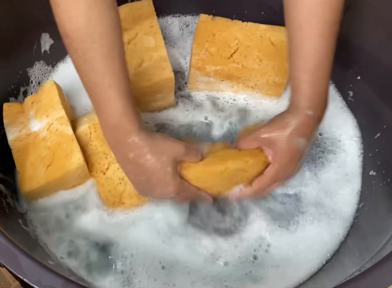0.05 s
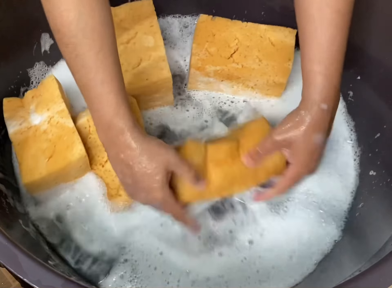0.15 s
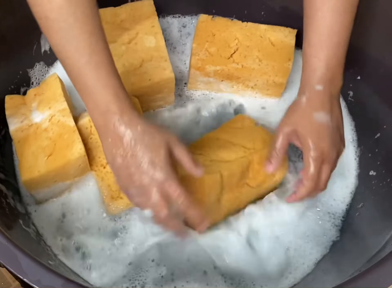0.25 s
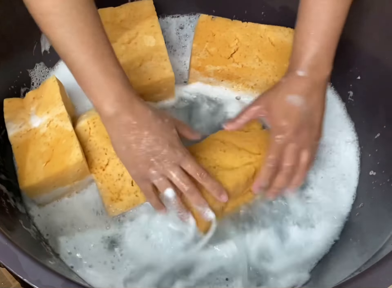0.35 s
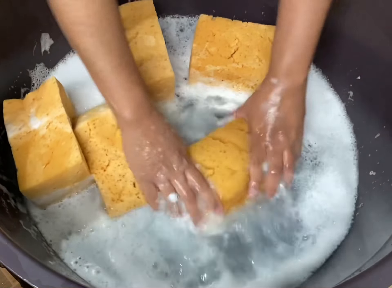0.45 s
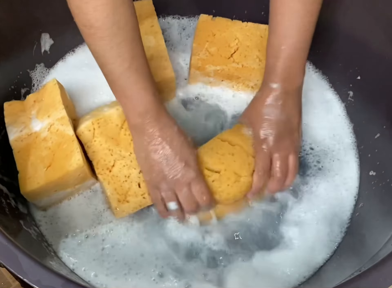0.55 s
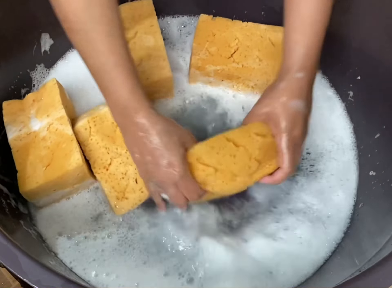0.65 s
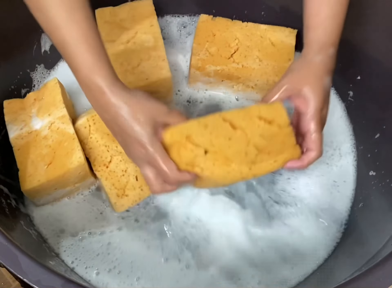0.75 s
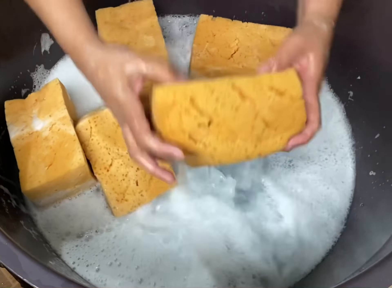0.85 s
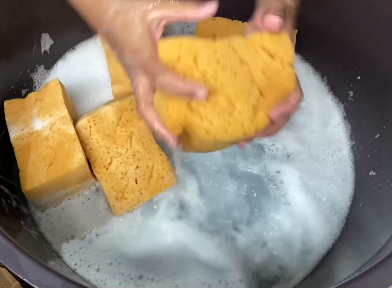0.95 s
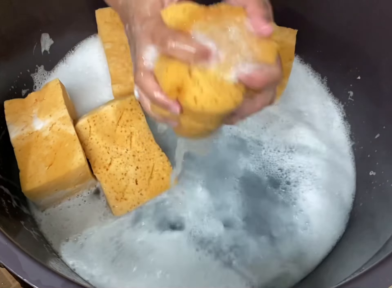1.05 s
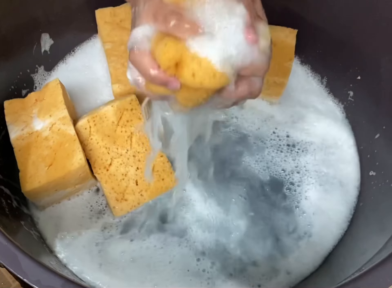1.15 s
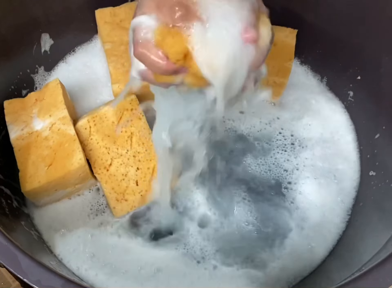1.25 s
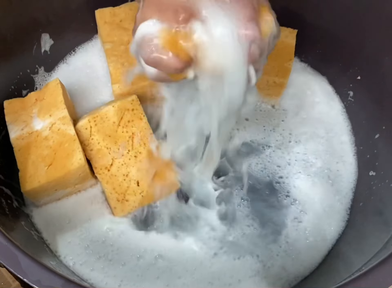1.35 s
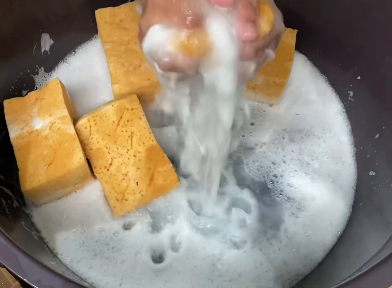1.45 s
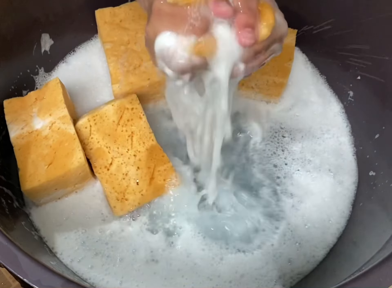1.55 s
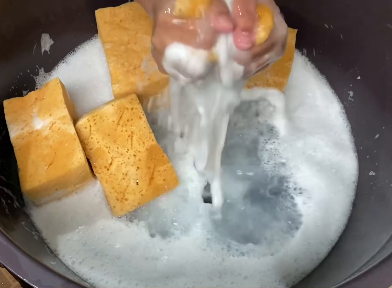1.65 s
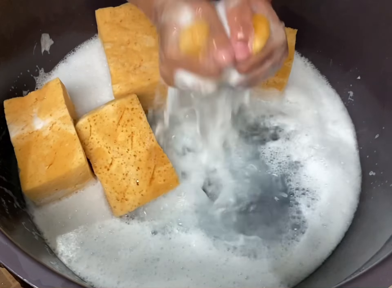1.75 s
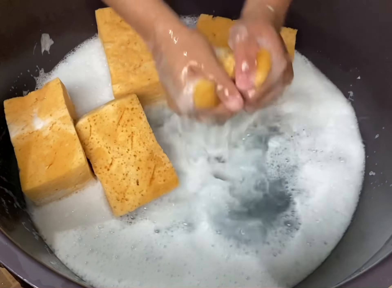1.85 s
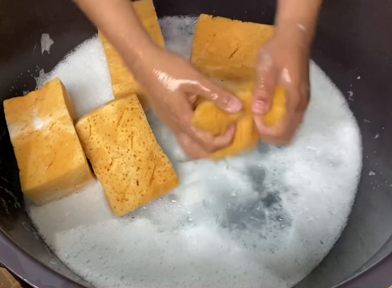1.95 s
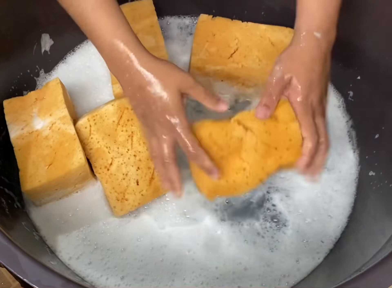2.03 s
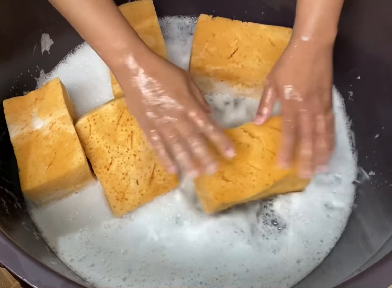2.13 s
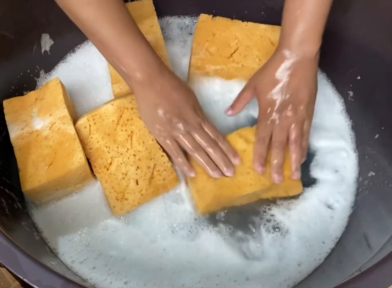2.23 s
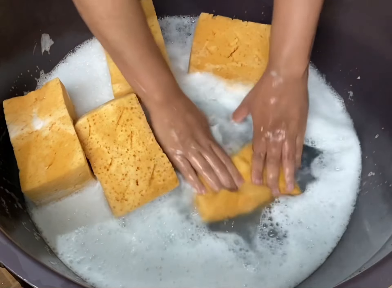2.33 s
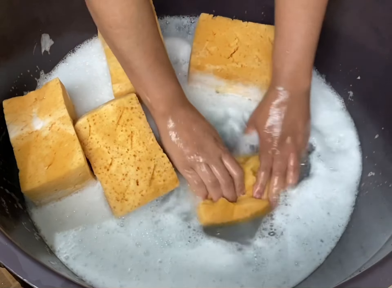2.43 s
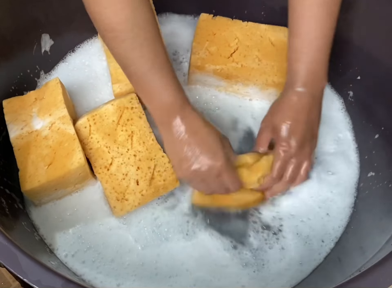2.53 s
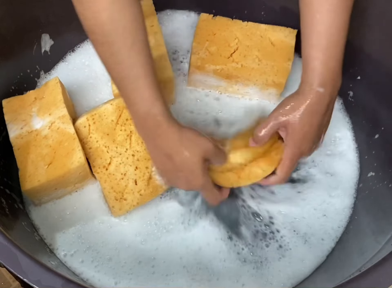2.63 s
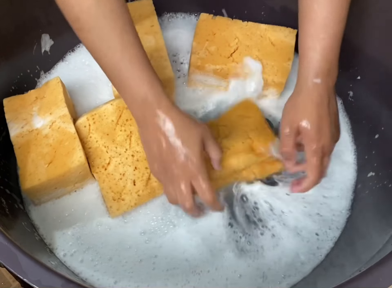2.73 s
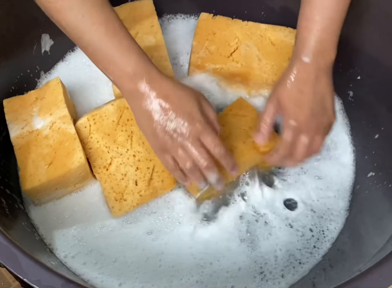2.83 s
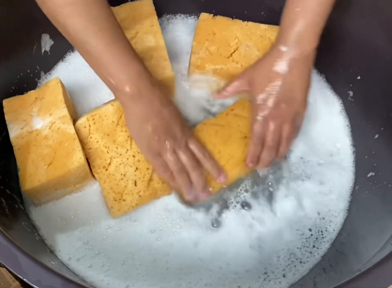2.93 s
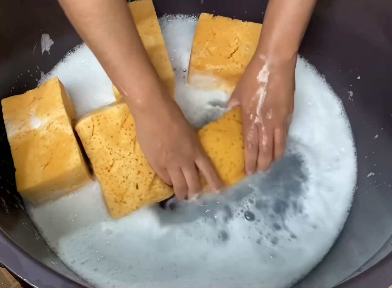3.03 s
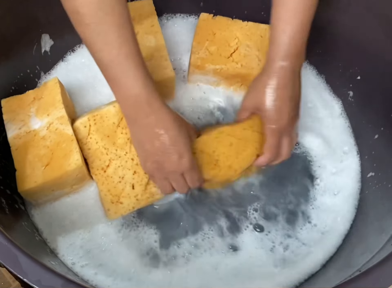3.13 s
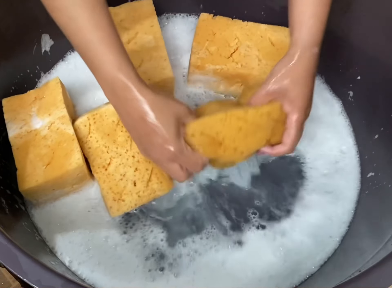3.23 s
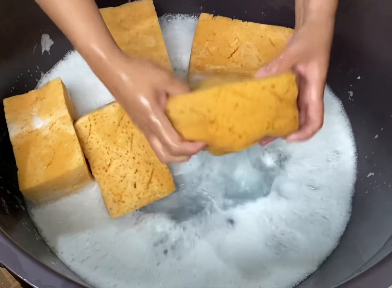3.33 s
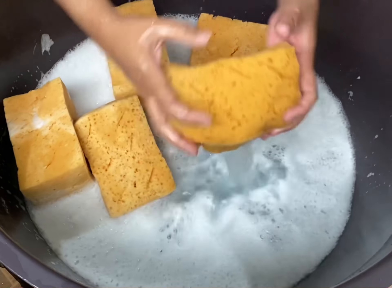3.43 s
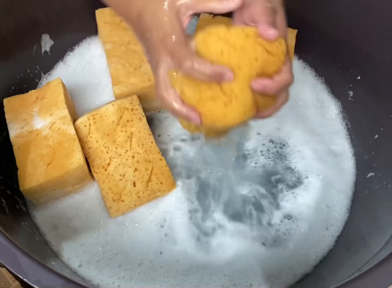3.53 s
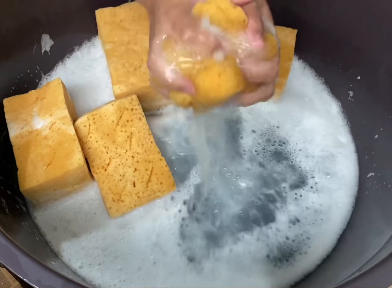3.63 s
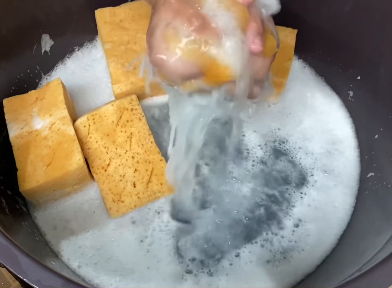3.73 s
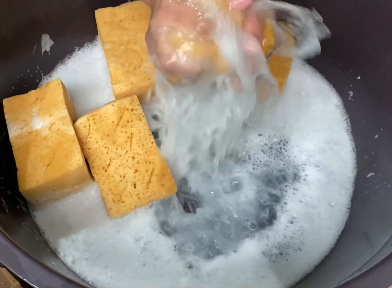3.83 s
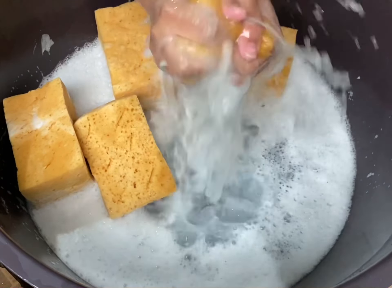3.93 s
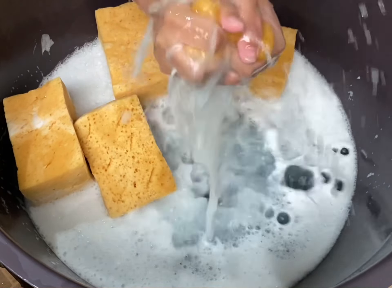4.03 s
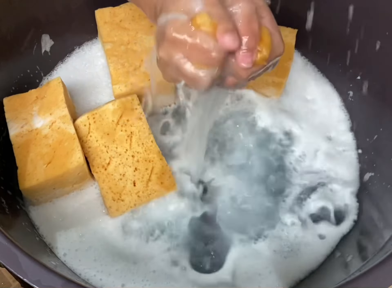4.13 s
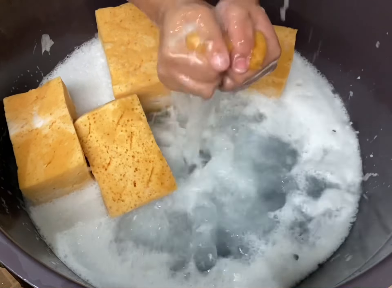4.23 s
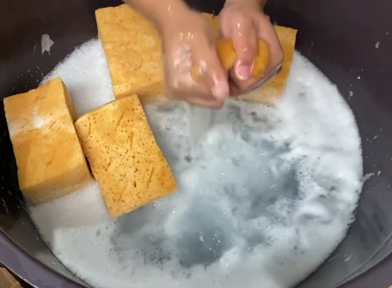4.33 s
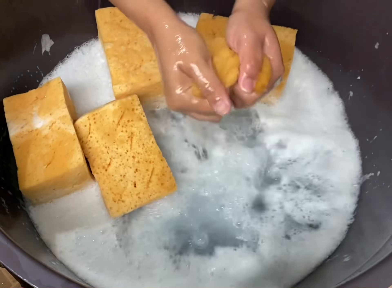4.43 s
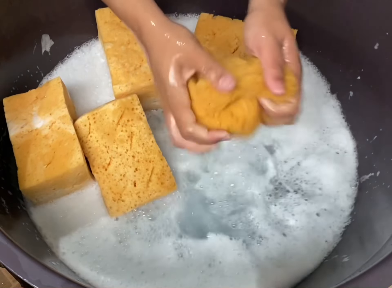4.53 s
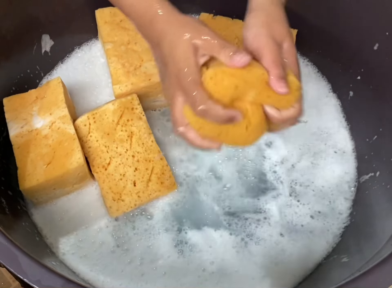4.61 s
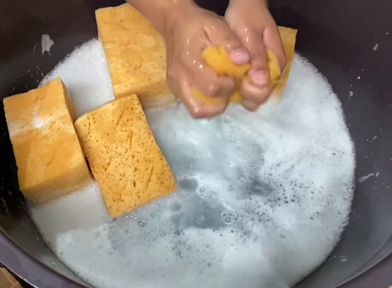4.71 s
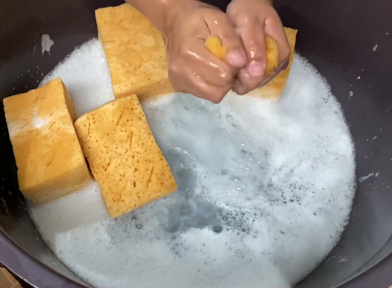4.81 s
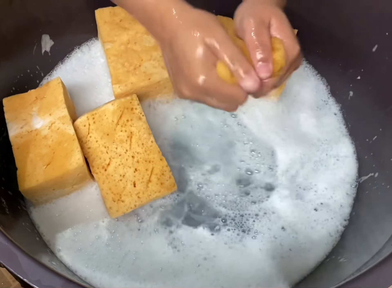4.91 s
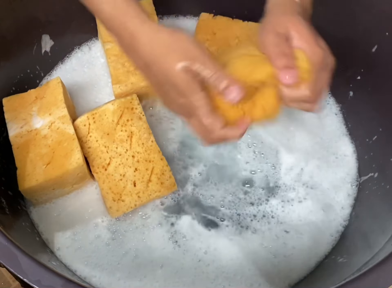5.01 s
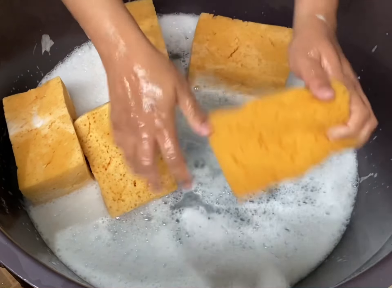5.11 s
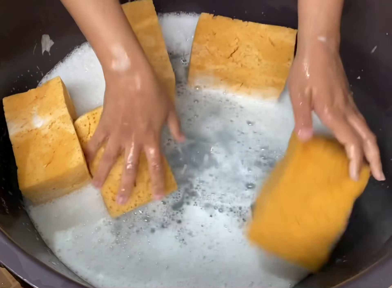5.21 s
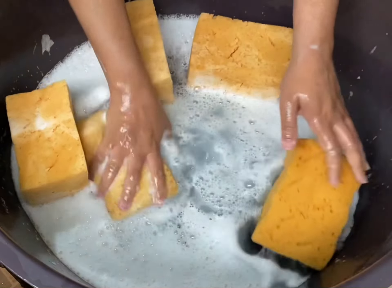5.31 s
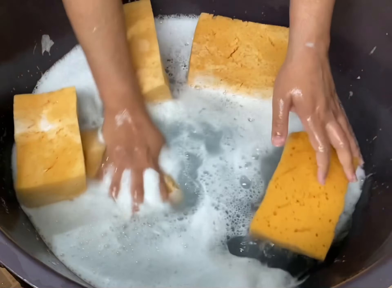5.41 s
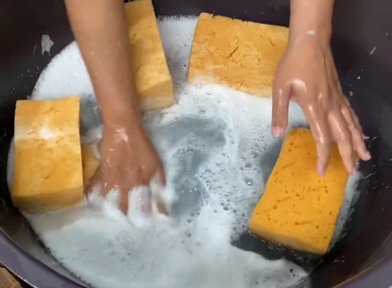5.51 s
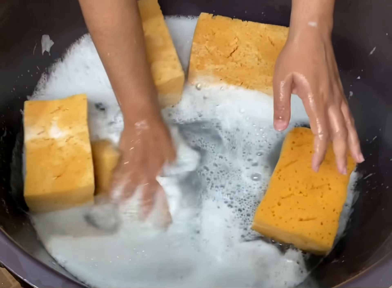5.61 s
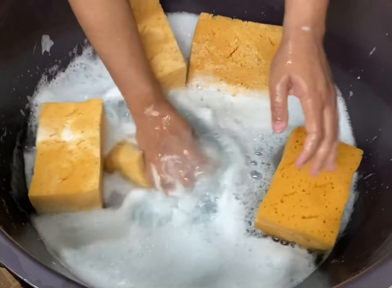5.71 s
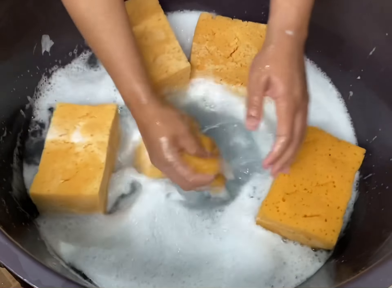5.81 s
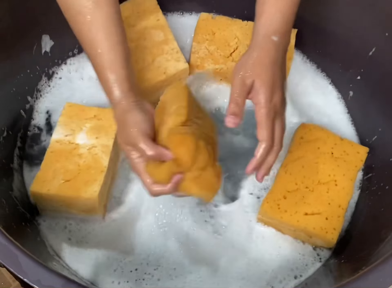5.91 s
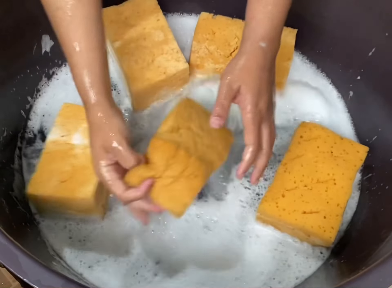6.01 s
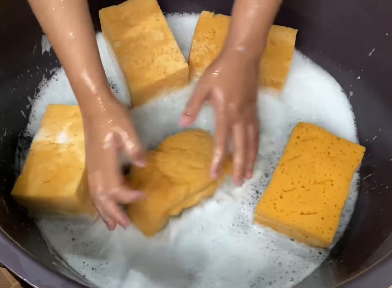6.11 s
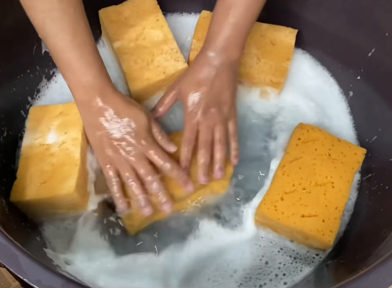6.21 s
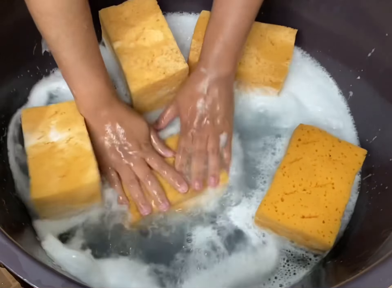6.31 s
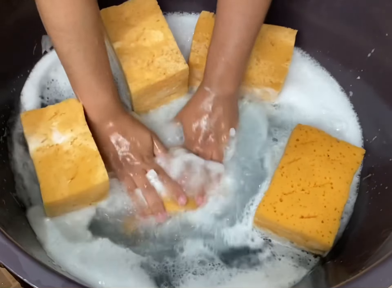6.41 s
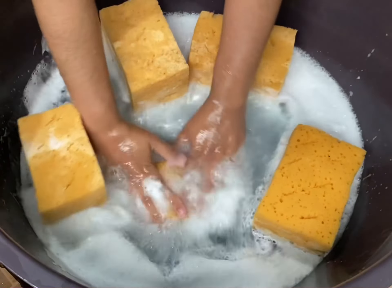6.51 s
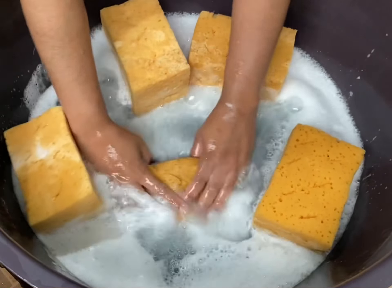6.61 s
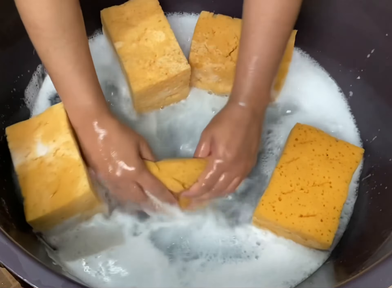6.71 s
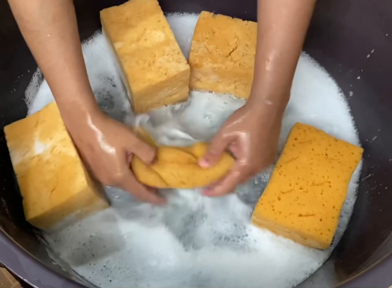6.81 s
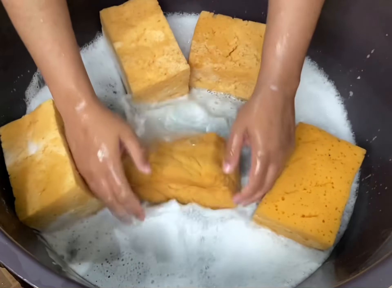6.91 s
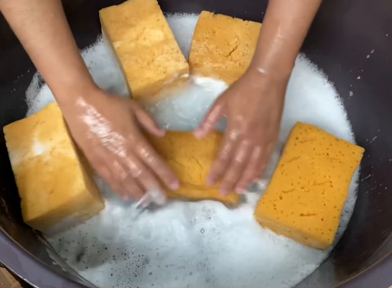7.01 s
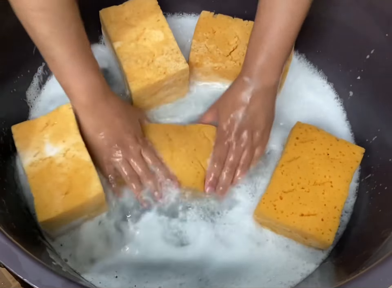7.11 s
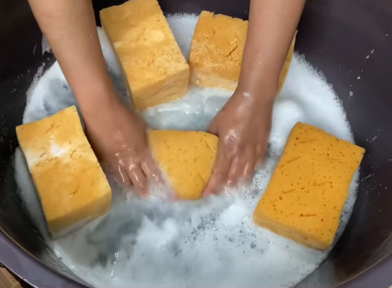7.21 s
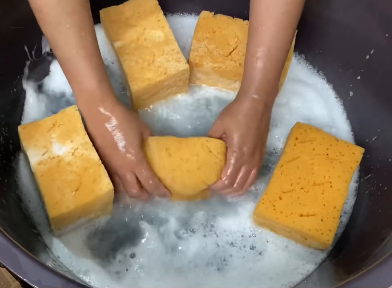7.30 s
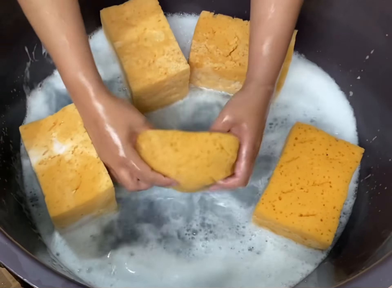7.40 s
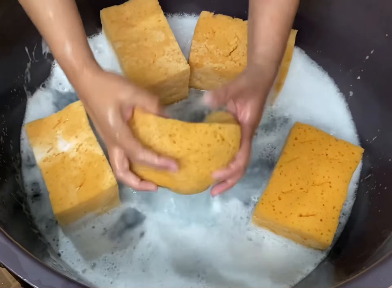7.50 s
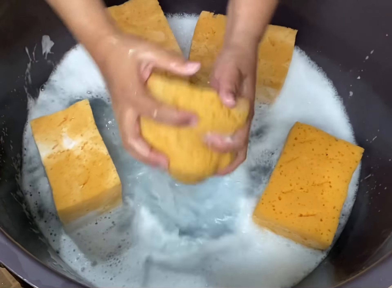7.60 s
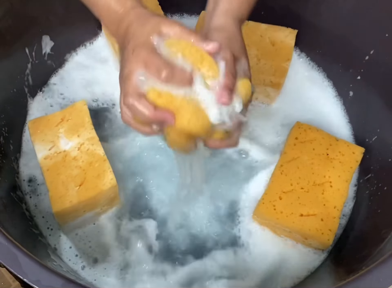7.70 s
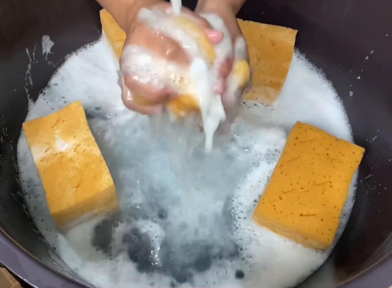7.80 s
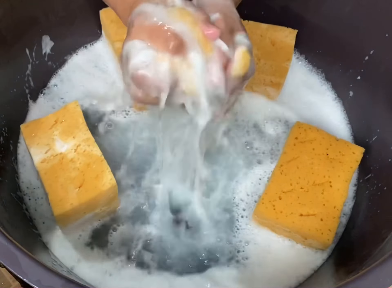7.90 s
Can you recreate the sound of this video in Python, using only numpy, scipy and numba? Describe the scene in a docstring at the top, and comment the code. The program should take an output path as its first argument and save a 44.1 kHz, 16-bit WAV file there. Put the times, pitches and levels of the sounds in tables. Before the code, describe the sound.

Close stereo sound of hands working foam sponges in a plastic basin of soapy water, in a quiet, nearly dry room. From 0 to 0.9 s, short squelching pushes bring low hollow gulps, popping suds and soft sloshing. The sponge is raised, its dripping growing, and from 1.1 to 2 s it is wrung: a loud, bright, bubbly stream splashes back in uneven gushes, with ringing plops, then thins. Pressing and gulping resume from 2 to 3.1 s, then another draining lift and a second strong pour at 3.6-4.5 s, with sharp plops and pops. A quieter stretch follows, with fizzing suds and a tiny crackling suck of air near 4.7 s. From 5.1 to 7.2 s another sponge is dunked and kneaded with deep gulps, squishes and rocking water. It drains increasingly from 7.3 s, and a third splashing pour begins at 7.8 s, cut off at the end.

```python
"""In a plastic basin of soapy water, close by, two hands work foam sponges.
A sponge is pushed under with a low gulp, squelches as it soaks, is lifted and wrung so that water
pours back in; this happens three times. Swarms of decaying sines make the bubbles, wet pores and fizz;
single sines ring for gulps, large bubbles and bursting films; noise heaves in the low basin modes.
Resonators and a colour curve shape the water, over a faint room tail and quiet air."""
import sys
import numpy as np
from scipy import signal
from scipy.fft import rfft, irfft, next_fast_len
from scipy.io import wavfile
from scipy.ndimage import uniform_filter1d
from numba import njit

SR = 44100
rng = np.random.default_rng(int(sys.argv[2]) if len(sys.argv) > 2 else 0)


def materialize(psi):
    """Save the field psi as 16-bit PCM at rate SR to the path in sys.argv[1].

    A 1-D psi becomes a single channel; in a 2-D psi each row is a channel.
    """
    bounded = np.clip(np.atleast_2d(psi).T, -1, 1)
    quanta = np.round(bounded * 32767).astype(np.int16)
    wavfile.write(sys.argv[1], SR, quanta)


N = 350595
T = np.arange(N) / SR
TICK = T[::40]  # slow time grid for the level curves, s

# Tables. Source levels are those before the gains of the functions that use them.
# Still air of the room, relative spectrum: [f/Hz, level/dB per Hz]
ROOM_AIR = [(20, -10), (40, 8), (65, 12), (120, -10), (300, -9), (15000, -12)]
# Low resonances of the filled basin: [f/Hz, width/Hz, level/dB]
BASIN_LOW_MODES = [(71, 20, 8.5), (122.7, 6.3, 6.5), (184.5, 9.2, 4.5), (230.5, 13, -4), (299, 9.8, -2.5)]
# Resonances of the air between the basin walls: [f/Hz, width/Hz, level/dB]
BASIN_AIR_MODES = [(422, 10, -5), (890, 110, -10.5), (1210, 114, -8), (1788, 69, -6.5)]
# Colour of the water sounds at the microphone: [f/Hz, level/dB]
WATER_COLOUR = [(100, 0.5), (250, -6), (450, -1), (650, -2.5), (850, 0.5), (1100, -3), (1700, 1),
                (3000, 2.5), (4800, 1.5), (7000, 3), (11000, 6.5), (15500, 5)]
# Pockets of air trapped under water by a sponge or hand: [t/s, level/dB, f/Hz, t60/s]
GULP_EVENTS = [(0.063, -38, 229, 0.15), (0.368, -32, 117, 0.18), (0.549, -35.5, 181, 0.097),
               (2.219, -31, 129, 0.13), (2.965, -42, 67, 0.33), (5.205, -33, 137, 0.12),
               (5.444, -31, 92, 0.16), (5.764, -39.5, 87, 0.18), (6.361, -43, 108, 0.3),
               (6.516, -41.5, 121.4, 0.38), (7.042, -40, 89, 0.15)]
# Soap films that burst: [t/s, peak level/dB, f/Hz, snap level/dB relative to the peak]
POP_EVENTS = [(0.036, -32, 1390, -12), (0.108, -29.5, 1490, -10), (0.316, -43.5, 7000, 2),
              (0.61, -24.5, 1260, -14), (0.777, -40, 710, 3.5), (0.904, -35, 1600, 1.5),
              (1.118, -40, 11200, 0), (1.131, -29.5, 5900, 2), (1.142, -34, 7360, 2), (1.233, -33, 2840, 1),
              (1.337, -24, 1770, -8), (1.527, -31, 2080, 0), (1.669, -33, 2500, 10.5),
              (1.984, -45.5, 1370, 6), (2.457, -29.5, 1270, -11), (2.524, -37, 1190, -12),
              (2.866, -31.5, 860, 0), (3.184, -36.5, 1400, -3), (3.326, -48, 3470, 12),
              (3.344, -40.5, 4500, -1), (3.373, -43, 2830, 6), (3.426, -32, 2620, -24),
              (3.463, -29.5, 1270, -4.5), (3.486, -34, 3380, -21), (3.528, -47, 4530, 11),
              (3.626, -22, 2850, -4.5), (3.637, -32, 4500, -4), (3.772, -19, 1880, -20),
              (3.821, -24, 1290, 3), (3.98, -19.5, 1920, -28), (4.309, -33.5, 5450, 6),
              (4.338, -37, 3830, 15.5), (4.447, -36, 880, 5.5), (4.682, -39, 4570, 1),
              (5.005, -41.5, 5118, -19), (5.116, -40, 1270, -35), (5.244, -29.5, 1330, -37),
              (5.652, -36, 1300, -12), (5.713, -36.5, 2250, 2.5), (6.099, -38, 1490, 2),
              (6.11, -29, 1150, -2), (6.502, -34.5, 2250, -0.5), (6.624, -29.5, 2880, -32),
              (6.759, -29.5, 1750, -11), (7.031, -26.5, 1120, -12), (7.4, -34, 1470, -10),
              (7.597, -36.5, 2100, 0), (7.697, -31, 1950, -5), (7.733, -33, 2940, -12),
              (7.888, -28, 2100, -16)]
# Single large bubbles that ring clearly: [t/s, level/dB, f/Hz]
PLOP_EVENTS = [(0.063, -32, 560), (0.351, -31, 785), (0.55, -28.5, 424), (0.779, -31.5, 576),
               (1.02, -28.5, 507), (1.05, -26.5, 2280), (1.204, -22.5, 430), (1.225, -27, 860),
               (1.358, -15.5, 713), (1.374, -24, 870), (1.464, -19.5, 800), (1.731, -26.5, 884),
               (2.216, -32, 414), (2.646, -33, 940), (2.874, -31.5, 494), (2.994, -37, 2250),
               (3.356, -37, 1290), (3.396, -38, 2760), (3.586, -28.5, 1760), (3.722, -20.5, 1810),
               (3.751, -22, 3140), (3.772, -21.5, 1950), (3.81, -17.5, 1450), (3.821, -18.5, 7200),
               (4.412, -26, 810), (5.206, -30, 373), (5.548, -39, 746), (5.77, -28, 960), (6.522, -33, 675),
               (6.719, -37, 1540), (6.734, -33, 1010), (7.112, -26, 844), (7.361, -38, 2110),
               (7.541, -35, 630), (7.751, -30, 1220)]
# A hand sweeps or presses a sponge through the water: [t/s, length/s, squelch level/dB,
# gurgle and fizz level/dB relative to the squelch, wave level/dB]
STROKE_EVENTS = [(0, 0.064, -52, 0, -3.5, -54), (0.06, 0.072, -45.5, -0.5, -10, -51),
                 (0.308, 0.19, -52.5, 2.5, -9, -50), (0.538, 0.16, -51, 1.5, -5.5, -52.5),
                 (0.77, 0.1, -58, 2.5, -4, -87), (1.01, 0.017, -67, 17, -9, -43.5),
                 (1.97, 0.022, -52.5, 1, -31, -46), (2.212, 0.025, -54.5, 7, -9, -45),
                 (2.453, 0.048, -52, 3, -10.5, -52), (2.542, 0.11, -53, 3, -5.5, -61),
                 (2.81, 0.18, -57.5, -0.5, -3, -49.5), (2.9, 0.21, -57, 4.5, -13, -54),
                 (4.49, 0.058, -68, -17, 14.5, -54), (4.77, 0.068, -60.5, 1, 5.5, -53),
                 (5.113, 0.068, -50.5, -4.5, -2.5, -46), (5.189, 0.015, -50.5, 9, -4, -47),
                 (5.43, 0.16, -72.5, 18, -10, -48.5), (5.601, 0.13, -59, 1, -3, -48.5),
                 (5.756, 0.094, -51.5, 5, -5.5, -62), (5.876, 0.17, -51, 3, -3, -53),
                 (6.2, 0.11, -46.5, 3, -7.5, -47.5), (6.501, 0.033, -61, 16, -2, -43),
                 (6.604, 0.28, -53, 3, -3, -59), (6.761, 0.015, -46.5, 3, -8.5, -69),
                 (6.986, 0.036, -49.5, 1, -0.5, -42.5), (7.088, 0.27, -55, 5, -8, -54),
                 (7.53, 0.39, -61, 10, -33, -50)]
# The full sponge is raised and drains ever faster: [t/s, length/s, final squelch level/dB]
LIFT_EVENTS = [(0.891, 0.35, -47), (3.15, 0.51, -46.5), (7.28, 0.58, -44.5)]
# The sponge is wrung and its water pours back: [t/s, length/s, peak squelch level/dB]
WRING_EVENTS = [(1.122, 0.84, -33), (3.608, 0.9, -32.5), (7.802, 0.42, -34)]
# Slugs of water that break from the sponge and land all at once: [t/s, level/dB]
GUSH_EVENTS = [(1.195, -34), (1.287, -42.5), (1.366, -33.5), (1.438, -33), (1.518, -34), (3.763, -33.5),
               (3.823, -31), (3.959, -31), (4.0, -36), (4.151, -38.5), (5.972, -40.5), (7.92, -38)]
# Phase turn of the left channel in the recorder: [f/Hz, lead/cycles]
LEFT_PHASE_LEAD = [(1200, 0), (2800, .07), (7450, 0), (8700, -.49), (9450, -.51), (10500, -1), (11600, -1),
                   (12900, -1.49), (13750, -1.51), (14700, -2)]

# Four-part settings, in the order gurgle, squelch, fizz, wave
DRAIN_MIX_DB = (-6, 0, -4, -11.5)
POUR_MIX_DB = (-9, -2.5, -5.5, -10.5)
POUR_FOLLOWS = (0.51, 0.95, 0.82, 0.3)  # share of the flow's dB swing that each part follows
POUR_DELAY_S = (0.074, 0.023, 0.032, 0.073)  # water must fall before it gurgles and rocks the basin
SETTLE_DB = (-11.5, -8, -8, -9)  # power left in the stirred suds
REST_DB = (-77, -77, -69, -63)  # the suds never quite come to rest

STROKE_ATTACK_S, STROKE_SAG_DB_PER_S, STROKE_RELEASE_DB_PER_S = 0.0047, 20, 157.5
WAVE_SWELL_S, WAVE_RELEASE_DB_PER_S = 0.055, 58  # the body of water is slow to start and to settle
DRAIN_GROWTH_DB_PER_S = 22.5
SETTLE_S = 0.14  # time constant with which stirred suds go on bursting
WRING_PEAK_SHARE = 0.3  # how far into the squeeze the flow is greatest
WRING_RISE_DB, WRING_FALL_DB, WRING_FALL_POWER = 6.5, 20, 1.39
SPLASH_DB, PLUNGE_DB = -7.5, -10  # slapping drops and dragged-under air, relative to the flow
GUSH_S, GUSH_RELEASE_DB_PER_S = 0.011, 600
SUCK_START_S, SUCK_LENGTH_S, SUCK_DB = 4.667, 0.055, -43
POP_MID_HZ, POP_SHORTENING = 1640, 0.3  # smaller films are over sooner: usual pitch, power of the pitch
PLOP_MID_HZ, PLOP_RING_GROWTH = 1000, 0.41  # smaller bubbles ring for more cycles: same two settings
MONO_HZ, CUTOFF_HZ = 6950, 15900  # channels merge above the first; the top is cut at the second


def from_db(db):
    """Logarithmic level: an amplitude gain is 10 to the power of dB / 20."""
    return 10 ** (np.asarray(db) / 20)


def rms_one(x):
    """Power normalisation: scale to unit mean square."""
    return x / np.sqrt(np.mean(x ** 2) + 1e-20)


def band(x, low_hz, high_hz, order=2):
    """Causal band-pass filtering with a Butterworth response."""
    edges = [low_hz, min(high_hz, .48 * SR)]
    sos = signal.butter(order, edges, "band", fs=SR, output="sos")
    return signal.sosfilt(sos, x + 1e-18)


def coloured(x, spectrum):
    """Linear filtering in the frequency domain: gain in dB interpolated over log frequency."""
    hz, db = np.transpose(spectrum)
    size = next_fast_len(N + SR // 10)
    bins = np.maximum(np.fft.rfftfreq(size, 1 / SR), 1)
    gain = from_db(np.interp(np.log(bins), np.log(hz), db))
    return irfft(rfft(x, size) * gain, size)[..., :N]


def resonances(x, modes):
    """Modal superposition: each mode is a two-pole resonator whose width sets its decay."""
    out = 0
    for hz, width, db in modes:
        radius = np.exp(-np.pi * width / SR)
        gain = from_db(db) * (1 - radius * radius) / 2
        poles = [1, -2 * radius * np.cos(2 * np.pi * hz / SR), radius * radius]
        out = out + gain * signal.lfilter([1, 0, -1], poles, x)
    return out


def evened(x, span_s):
    """Short-time power normalisation: near unit power in each span, with the grain inside it kept."""
    size = max(int(span_s * SR), 2)
    power = np.atleast_2d(x ** 2).mean(axis=0)
    power = uniform_filter1d(uniform_filter1d(power, size), size)
    return x / np.sqrt(np.maximum(power, 0) + np.mean(x ** 2) / 1000)


def add(track, s, sound):
    """Superposition: mix a sound into a track at a time in seconds."""
    start = max(int(s * SR), 0)
    track[..., start:start + sound.shape[-1]] += sound[..., :N - start]


def two_ears(size, apart):
    """Partial coherence: stereo noise with a shared part and a separate part on each side."""
    shared = rng.standard_normal(size)
    separate = rng.standard_normal((2, size))
    return (shared + apart * separate) / np.hypot(1, apart)


def gesture(s, length_s, attack_s, release_db_per_s):
    """Envelope of a driven source: gain rises linearly, holds and decays exponentially."""
    swell = np.clip((TICK - s) / attack_s, 0, 1)
    return swell * from_db(-release_db_per_s * np.clip(TICK - s - length_s, 0, 1))


def level_curve(power):
    """Power level: ten times the logarithm of a slow power curve, in dB at every sample."""
    return np.interp(T, TICK, 10 * np.log10(power + 1e-10))


@njit
def ring_bubbles(starts, step, cycles, sizes, rise, length):
    """Damped oscillation: each bubble is a dying sine whose pitch climbs as it nears the surface."""
    out = np.zeros(length)
    for k in range(len(starts)):
        life = int(cycles[k] * 2 * np.pi / step[k]) + 2
        for i in range(min(life, length - starts[k])):
            age = i / life
            phase = step[k] * i * (1 + rise * age / 2)
            out[starts[k] + i] += sizes[k] * np.exp(-6.9 * age) * np.sin(phase)  # -60 dB at age 1
    return out


def bubbles(level_db, per_s, low_hz, high_hz, cycles, spread_db, rise, tilt, even_s,
            crowding=.3, wall_db=-6, wall_s=.005, pan_db=2.2):
    """Random point process: a stronger flow makes more bubbles (by crowding) as well as louder ones."""
    rate = per_s * from_db(crowding * (level_db - np.median(level_db)))
    born = np.flatnonzero(rng.random(N) < rate / SR)
    pitch, size, damping, place, *paths = rng.random((6, N))[:, born]
    hz = low_hz * (high_hz / low_hz) ** pitch
    sizes = from_db(spread_db * np.minimum(-np.log(size), 4.5))
    sizes = sizes * (hz / low_hz) ** tilt * (-1.) ** born  # random polarity
    step = 2 * np.pi * hz / SR
    rings = cycles * 2 ** (2 * damping - 1)
    swarm = []
    for side, path in zip((1, -1), paths):
        # every bubble has its own place, so its echo off the basin wall has its own delay
        panned = sizes * from_db(side * pan_db * (2 * place - 0.72))
        direct = ring_bubbles(born, step, rings, panned, rise, N)
        reflected_at = born + (path * wall_s * SR).astype(int)
        echo = ring_bubbles(reflected_at, step, rings, sizes, rise, N)
        swarm.append(direct + from_db(wall_db) * echo)
    swarm = band(np.array(swarm), low_hz * 0.43, high_hz * 2.46)
    return from_db(level_db) * evened(swarm, even_s)


def room_air():
    """Stationary broadband noise: the still air of the room, nearly alike on both sides."""
    return from_db(-61) * rms_one(coloured(two_ears(size=N, apart=0.2), ROOM_AIR))


def room(x, level_db, t60, size=4096):
    """Diffuse reverberation: moving arms and waves change the reflections, so each block has its own tail."""
    out, t = np.zeros((2, N)), T[:SR // 3]
    fade = from_db(-60 * t / t60) * (t > .003)
    for start in range(0, N, size):
        tails = two_ears(size=len(t), apart=1.59) * fade / np.linalg.norm(fade)
        add(out, T[start], signal.fftconvolve(x[:, start:start + size], tails, axes=1))
    return from_db(level_db) * band(out, 273, 23000, order=1)


def heave(level_db):
    """Forced resonance: the rocking water, as noise, drives the low modes of the basin."""
    rocking = resonances(rng.standard_normal(N), BASIN_LOW_MODES)
    return from_db(level_db - 1.0) * evened(rocking, span_s=0.033)


def gulps(level_db, swell_s, glide, glide_s, churn):
    """Volume resonance of trapped air: the pitch drops as it is pushed under, with a wash of noise."""
    out, t = np.zeros(N), T[:SR // 2]
    for s, db, hz, t60 in GULP_EVENTS:
        phase = 2 * np.pi * np.cumsum(hz * (1 + glide * np.exp(-t / glide_s))) / SR
        wash = rms_one(band(rng.standard_normal(len(t)), hz * 1.43, hz * 3))
        envelope = from_db(db + level_db - 60 * t / t60) * (1 - np.exp(-t / swell_s))
        add(out, s, envelope * (np.sin(phase) + churn * wash))
    return out


def pops(ring_db, spray_db, snap_db, cycles, spray_s, snap_s, tear_s, rise=0.023):
    """Film rupture: a film tears with a snap, the opened pocket rings and a short spray of droplets follows."""
    rings, sprays, snaps = np.zeros((3, 2, N))
    t = T[:SR // 10]
    for s, db, hz, bright_db in POP_EVENTS:
        brief = (POP_MID_HZ / hz) ** POP_SHORTENING
        tear = 1 - np.exp(-t / (tear_s * brief))
        age = np.minimum(t * hz / cycles, 2)
        grains = two_ears(size=len(t), apart=.4) * from_db(3 * rng.standard_normal(len(t)))
        tone = np.sin(2 * np.pi * hz * t * (1 + rise * age / 2))
        spray = rms_one(band(grains, hz * 0.25, hz * 2.03))
        add(rings, s, from_db(db - 60 * age) * tone * (1 - np.exp(-t * hz)))
        add(sprays, s, from_db(db) * tear * np.exp(-t / (spray_s * brief)) * spray)
        add(snaps, s, from_db(db + bright_db) * tear * np.exp(-t / (snap_s * brief)) * rms_one(grains))
    sprays = from_db(spray_db) * band(sprays, 440, 17000)
    snaps = from_db(snap_db) * band(snaps, 2600, 9500, order=1)
    return from_db(ring_db) * rings + sprays + snaps


def plops(level_db, cycles, swell_cycles, rise):
    """Bubble resonance: a large bubble pinches off and rings, climbing slightly in pitch."""
    out, t = np.zeros(N), T[:SR // 8]
    for s, db, hz in PLOP_EVENTS:
        ring_cycles = cycles * (hz / PLOP_MID_HZ) ** PLOP_RING_GROWTH
        age = np.minimum(t * hz / ring_cycles, 2)
        envelope = from_db(db + level_db - 60 * age) * (1 - np.exp(-t * hz / swell_cycles))
        add(out, s, envelope * np.sin(2 * np.pi * hz * t * (1 + rise * age / 2)))
    return out


def suck():
    """Inflow through wet pores: the emptied sponge opens, sucks in air and tiny films snap in turn."""
    gain = from_db(SUCK_DB) * gesture(SUCK_START_S, SUCK_LENGTH_S, attack_s=.025, release_db_per_s=480)
    level_db = level_curve(gain ** 2)
    pores = bubbles(level_db, per_s=1500, low_hz=3400, high_hz=7000, cycles=8, spread_db=3,
                    rise=.02, tilt=.05, even_s=.015, crowding=0)
    films = bubbles(level_db - 6, per_s=400, low_hz=2200, high_hz=8000, cycles=2, spread_db=3,
                    rise=0, tilt=.3, even_s=.03, crowding=0)
    return pores + films


def draining():
    """Accelerating outflow: gain of the water that runs out of a raised sponge grows in dB with time."""
    total = 0
    for s, length_s, db in LIFT_EVENTS:
        growth = from_db(db + DRAIN_GROWTH_DB_PER_S * np.minimum(TICK - s - length_s, 0))
        total = total + growth * gesture(s, length_s, STROKE_ATTACK_S, STROKE_RELEASE_DB_PER_S)
    return total


def wringing(s, length_s, follows):
    """Pressure-driven flow: it builds as the grip tightens and dwindles as the sponge empties."""
    progress = np.clip((TICK - s) / length_s, 0, 1)
    slack = np.maximum(1 - progress / WRING_PEAK_SHARE, 0)
    emptied = np.maximum(progress - WRING_PEAK_SHARE, 0) / (1 - WRING_PEAK_SHARE)
    flow_db = -WRING_RISE_DB * slack ** 2 - WRING_FALL_DB * emptied ** WRING_FALL_POWER
    return from_db(follows * flow_db) * gesture(s, length_s, STROKE_ATTACK_S, STROKE_RELEASE_DB_PER_S)


def splashes():
    """Impact and air entrainment: the falling stream slaps in sharp drops and drags air under, which glugs."""
    flow = sum(from_db(db) * wringing(s, length_s, follows=1.0) for s, length_s, db in WRING_EVENTS)
    flow_db = level_curve(flow ** 2)
    slaps = bubbles(flow_db + SPLASH_DB, per_s=130, low_hz=900, high_hz=5500, cycles=2.6, spread_db=2.5,
                    rise=0, tilt=.3, even_s=.08, crowding=0)
    glugs = bubbles(flow_db + PLUNGE_DB, per_s=90, low_hz=175, high_hz=260, cycles=7, spread_db=2.5,
                    rise=.1, tilt=0, even_s=.1, crowding=0)
    return slaps + glugs


def gushes():
    """Impact of a slug of water: it bursts into a tight clump of short bubbles of all sizes."""
    power = 0
    for s, db in GUSH_EVENTS:
        gain = from_db(db) * gesture(s, GUSH_S, STROKE_ATTACK_S, GUSH_RELEASE_DB_PER_S)
        power = power + gain ** 2
    return bubbles(level_curve(power), per_s=900, low_hz=850, high_hz=4200, cycles=5.5, spread_db=3,
                   rise=.1, tilt=0, even_s=.015, crowding=0)


def stirring():
    """Power addition: strokes, lifts and wrings sum to the dB of gurgle, squelch, fizz and wave."""
    power = np.outer(from_db(DRAIN_MIX_DB), draining()) ** 2
    for s, length_s, db, gurgle_db, fizz_db, wave_db in STROKE_EVENTS:
        push = gesture(s, length_s, STROKE_ATTACK_S, STROKE_RELEASE_DB_PER_S)
        push = push * from_db(db - STROKE_SAG_DB_PER_S * np.maximum(TICK - s, 0))
        power[:-1] += np.outer(from_db([gurgle_db, 0, fizz_db]), push) ** 2
        wave = gesture(s, length_s, WAVE_SWELL_S, WAVE_RELEASE_DB_PER_S)
        power[-1] += (from_db(wave_db) * wave) ** 2
    # stirred suds go on bursting for a while; the pours are added after this lag
    keep = np.exp(-TICK[1] / SETTLE_S)
    lingering = signal.lfilter([1 - keep], [1, -keep], power)
    power += from_db(SETTLE_DB)[:, None] ** 2 * lingering
    for s, length_s, db in WRING_EVENTS:
        for part, (mix_db, follows, delay_s) in enumerate(zip(POUR_MIX_DB, POUR_FOLLOWS, POUR_DELAY_S)):
            pour = wringing(s + delay_s, length_s - delay_s, follows)
            power[part] += (from_db(db + mix_db) * pour) ** 2
    return [level_curve(p + from_db(rest_db) ** 2) for p, rest_db in zip(power, REST_DB)]


def spurts(per_s, fade_s, depth):
    """Amplitude modulation by shot noise: water leaves the pores in spurts that start at once and fade."""
    kicks = (rng.random(N) < per_s / SR) * rng.uniform(0.081, 1, N)
    fading = signal.lfilter([1], [1, -np.exp(-1 / (fade_s * SR))], kicks)
    return evened(1 + depth * fading, span_s=0.03)


def stirred_water(gurgle_db, squelch_db, fizz_db):
    """Bubble resonance by size: large ones glug, pores crackle, films fizz and tick, single drips ring."""
    glug = bubbles(gurgle_db - 3.5, per_s=230, low_hz=116.0, high_hz=291, cycles=12.6, spread_db=7,
                   rise=0.12, tilt=0.059, even_s=0.048, wall_db=-29, pan_db=-2.0)
    gurgle = bubbles(gurgle_db + 0.5, per_s=380, low_hz=268, high_hz=1130, cycles=7.4, spread_db=4.5,
                     rise=0.14, tilt=0.77, even_s=0.04)
    squelch = bubbles(squelch_db - 4, per_s=650, low_hz=1180, high_hz=4400, cycles=9.7, spread_db=3.2,
                      rise=0.16, tilt=0.2, even_s=0.03)
    fizz = bubbles(fizz_db - 3.5, per_s=2200, low_hz=4400, high_hz=15000, cycles=12, spread_db=4.4,
                   rise=.05, tilt=.07, even_s=.07, wall_db=-1)
    ticks = bubbles(fizz_db - 5.0, per_s=190, low_hz=1580, high_hz=13500, cycles=0.93, spread_db=-0.5,
                    rise=.01, tilt=0.4, even_s=0.38)
    drips = bubbles(squelch_db - 5, per_s=75, low_hz=900, high_hz=3800, cycles=18, spread_db=3.3,
                    rise=.22, tilt=.1, even_s=.12, crowding=.1)
    droplets = bubbles(fizz_db - 6.5, per_s=45, low_hz=3200, high_hz=11000, cycles=42, spread_db=4,
                       rise=.05, tilt=0, even_s=.14, crowding=.25)
    spurting = (gurgle + squelch + fizz + ticks) * spurts(per_s=37, fade_s=0.0044, depth=0.96)
    return glug + drips + droplets + spurting


def scene():
    """Source and resonator: the water sounds are coloured by the basin, over quiet room air."""
    gurgle_db, squelch_db, fizz_db, wave_db = stirring()
    water = stirred_water(gurgle_db, squelch_db, fizz_db) + suck() + splashes() + gushes()
    water = water + pops(ring_db=.5, spray_db=-1.5, snap_db=7.5, cycles=13,
                         spray_s=.0045, snap_s=.0022, tear_s=.0018)
    water = water + plops(level_db=1.5, cycles=18.4, swell_cycles=0.49, rise=0.028)
    water = from_db(-1.5) * (water + resonances(water, BASIN_AIR_MODES))
    low_water = heave(wave_db) + gulps(level_db=7.0, swell_s=0.0058, glide=1.96, glide_s=0.004, churn=0.3)
    water = coloured(water + low_water, WATER_COLOUR)
    return water + room(water, level_db=-3.5, t60=0.15) + room_air()


def record(dry):
    """Band limits and interchannel phase: the recorder merges the treble, turns the left and cuts both ends."""
    size = next_fast_len(N + SR // 10)
    hz = np.fft.rfftfreq(size, 1 / SR)
    left, right = rfft(dry, size)
    mid = (left + right) / 2
    side = (left - right) / 2 / np.sqrt(1 + (hz / MONO_HZ) ** 40)
    turn = np.exp(2j * np.pi * np.interp(hz, *np.transpose(LEFT_PHASE_LEAD)))
    heard = irfft(np.array([(mid + side) * turn, mid - side]), size)[:, :N]
    bass_cut = signal.butter(3, 35, "high", fs=SR, output="sos")
    top_cut = signal.ellip(10, .1, 80, CUTOFF_HZ, fs=SR, output="sos")
    return signal.sosfilt(top_cut, signal.sosfilt(bass_cut, heard))


dry = scene()
out = record(dry)
materialize(out)
```